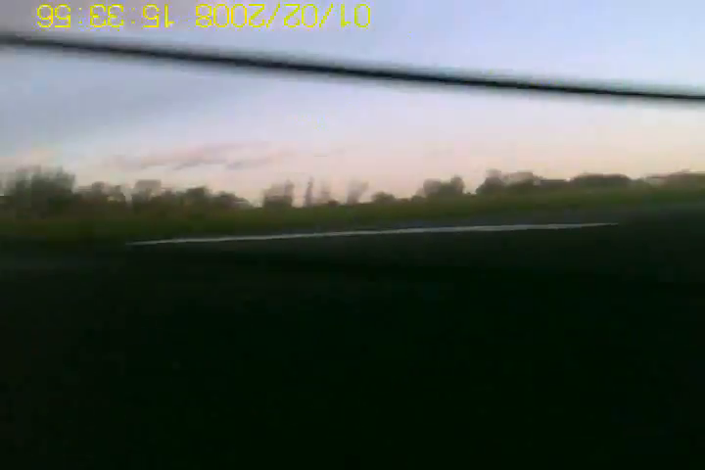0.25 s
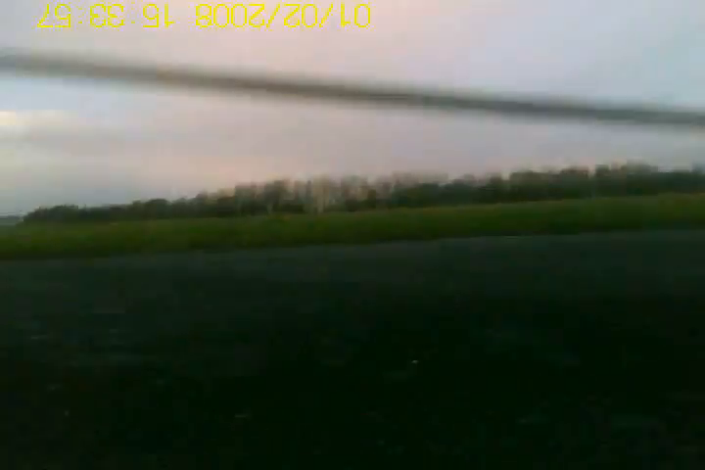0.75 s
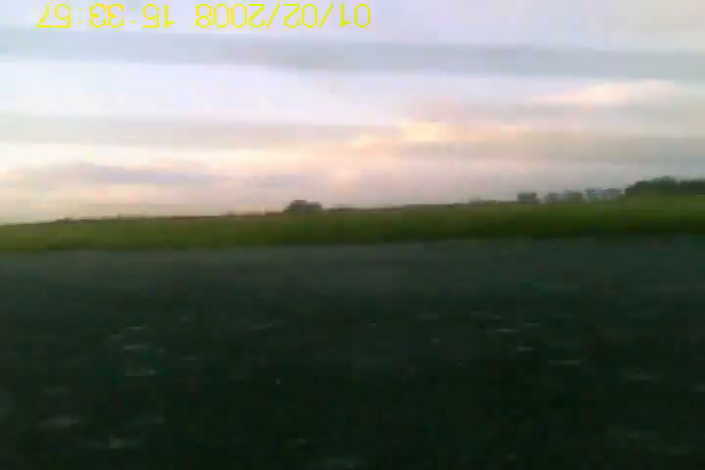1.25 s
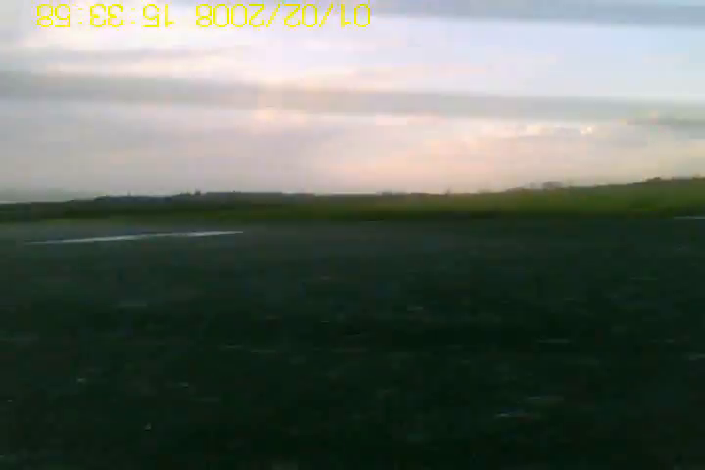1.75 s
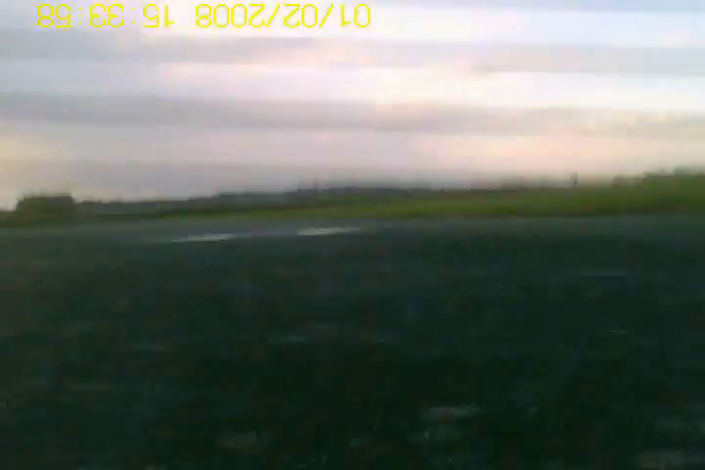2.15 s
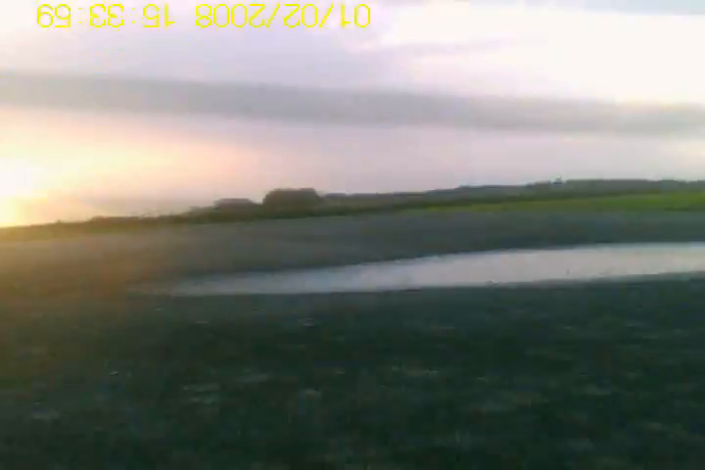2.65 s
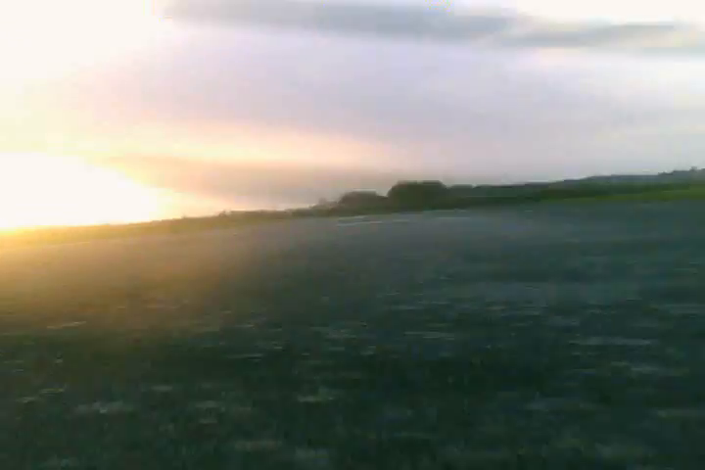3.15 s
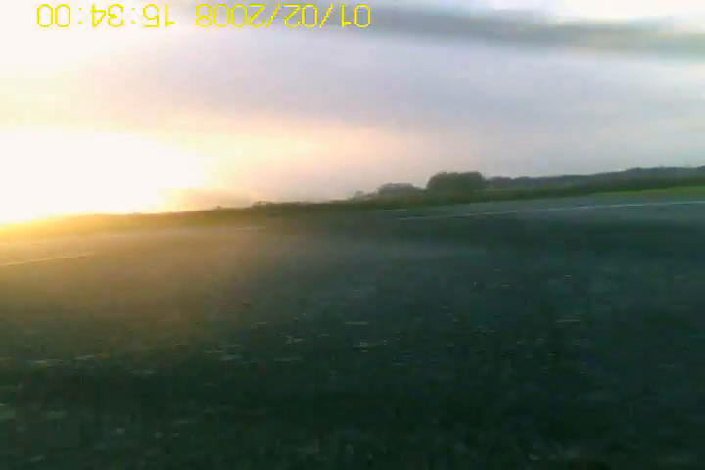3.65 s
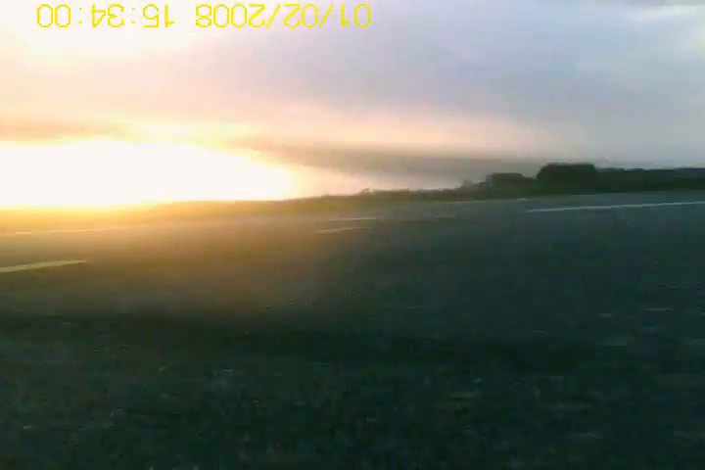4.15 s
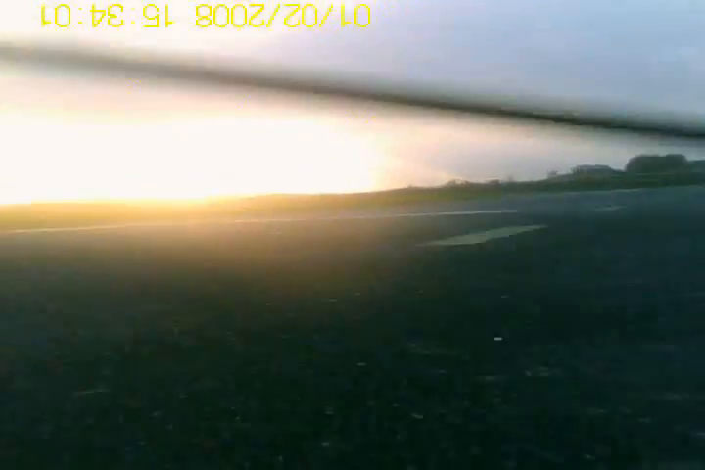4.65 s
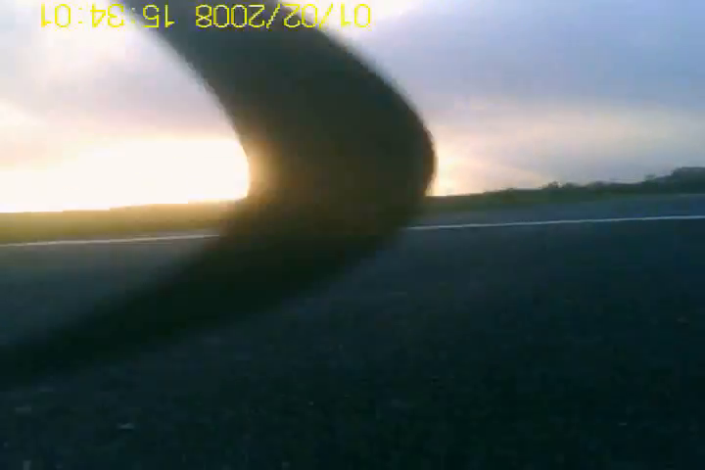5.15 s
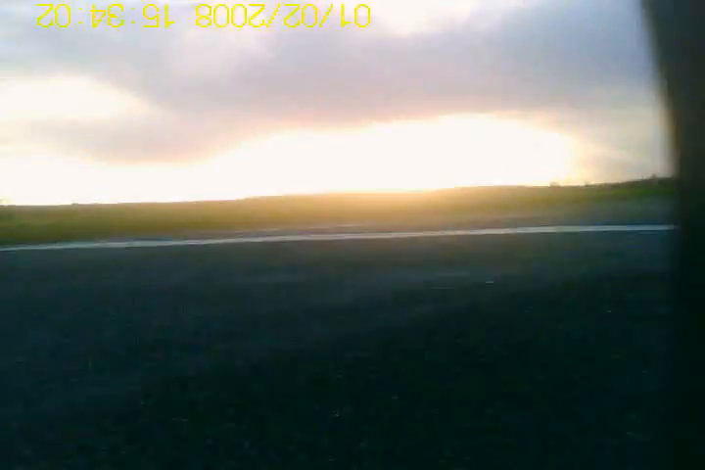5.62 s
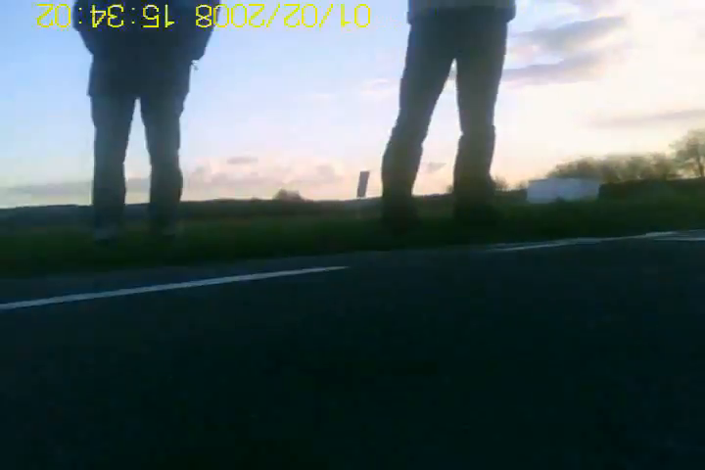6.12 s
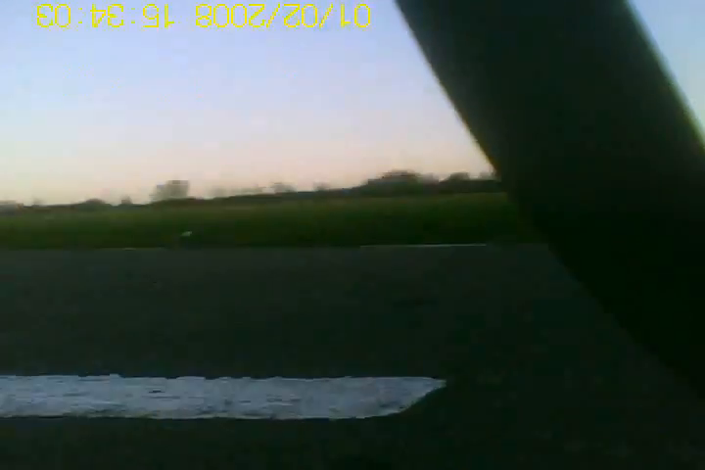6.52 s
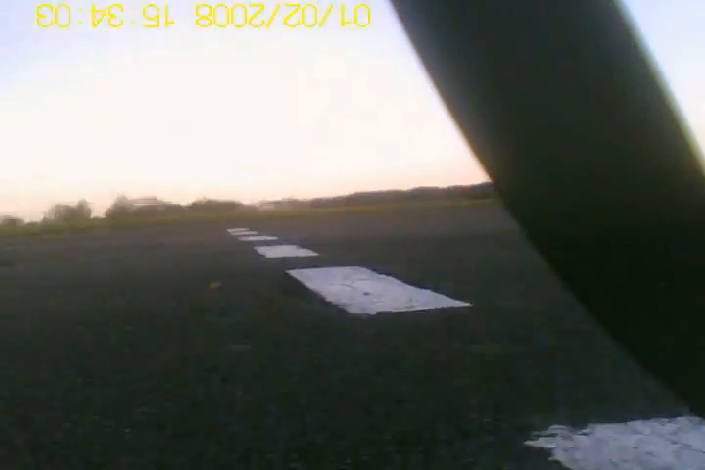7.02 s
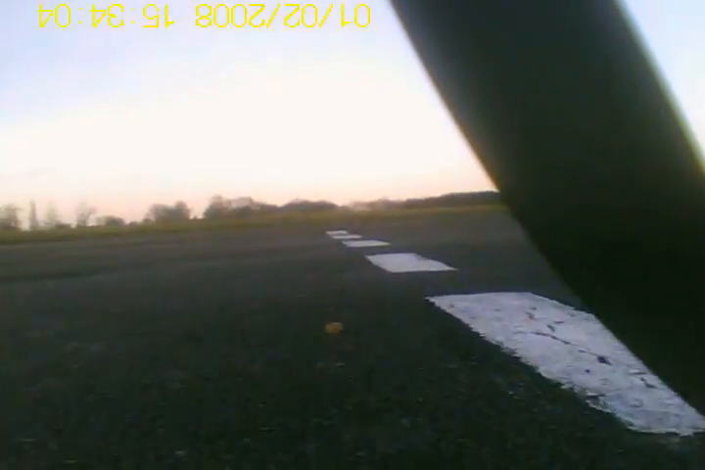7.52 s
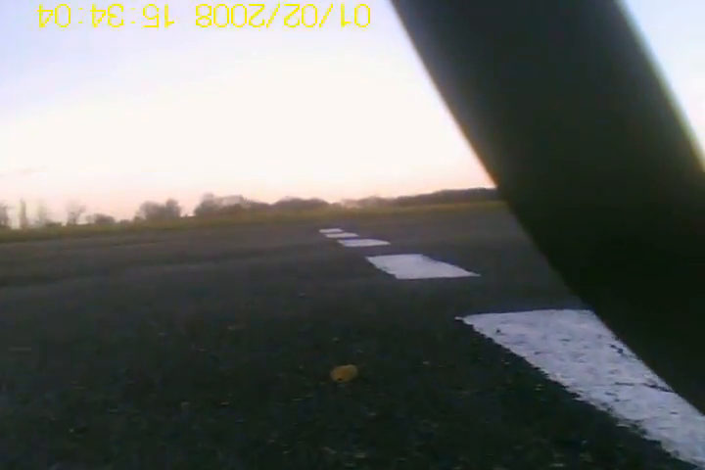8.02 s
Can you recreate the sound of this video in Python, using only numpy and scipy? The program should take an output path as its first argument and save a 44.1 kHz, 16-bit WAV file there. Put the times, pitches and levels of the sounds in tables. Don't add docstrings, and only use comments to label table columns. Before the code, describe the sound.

A microphone fixed to a little propeller plane picks up harsh rolling grit and loose clatter, a short growling rev that briefly overloads with a crackle, and a longer, steadier rev. Afterwards the drone sinks and coasts away, leaving dull wheel grind and bumps outdoors in a light breeze. The frame rattles again, jolts sharply, and the wheels scrape haltingly to rest, leaving faint hiss.

```python
import sys
import numpy as np
from scipy import signal
from scipy.fft import rfft, irfft
from scipy.io import wavfile

SR = 44100
rng = np.random.default_rng(int(sys.argv[2]) if len(sys.argv) > 2 else 0)


def waveform_to_disk(signal):
    frames = np.transpose(np.atleast_2d(signal))
    scaled = np.clip(frames, -1, 1) * 32767
    samples = np.round(scaled).astype(np.int16)
    wavfile.write(sys.argv[1], SR, samples)


def nominal_scale(level):
    x = np.asarray(level, float) / 20
    return 10 ** x


N = 365148


def rms_one(x):
    return x / np.sqrt(np.mean(x ** 2) + 1e-20)


def in_time(rows):
    s, *columns = np.transpose(rows)
    return [np.interp(np.arange(N) / SR, s, c) for c in columns]


def spells(rows, rise, fall):
    s = np.arange(N) / SR
    gain = 0
    for start, hold, db in rows:
        early = np.clip(start - s, 0, 1)
        late = np.clip(s - start - hold, 0, 1)
        gain = gain + nominal_scale(db - rise * early - fall * late)
    return gain


def drift(rate):
    r = np.exp(-2 * np.pi * rate / SR)
    return rms_one(signal.lfilter([1], [1, -2 * r, r * r], rng.standard_normal(N + SR))[SR:])


def colour(x, spectrum):
    size = 2 ** 20
    hz, db = np.transpose(spectrum)
    bin_hz = np.arange(size // 2 + 1) * SR / size
    log_gain = np.log(nominal_scale(np.interp(np.log(bin_hz + 1), np.log(hz), db)))
    cepstrum = irfft(log_gain)
    cepstrum[1:size // 2] *= 2
    cepstrum[size // 2 + 1:] = 0
    return rms_one(irfft(rfft(x, size) * np.exp(rfft(cepstrum)))[:N])


def resonate(x, modes):
    out = 0
    for k, (hz, width, db) in enumerate(modes):
        r, w = np.exp(-np.pi * abs(width) / SR), 2 * np.pi * hz / SR
        ring = signal.lfilter([0, np.sin(w)], [1, -2 * r * np.cos(w), r * r], x + 1e-18)
        out = out + (-1) ** k * nominal_scale(db) * ring
    return out


def sharp(x, modes):
    out = 0
    for hz, width, db in modes:
        band = signal.butter(1, [hz * .85, hz * 1.15], "band", fs=SR, output="sos")
        out = out + resonate(signal.sosfilt(band, x), [(hz, width, db)])
    return out


def grains(per_s, spread_db):
    sizes = nominal_scale(spread_db * np.minimum(rng.exponential(1, N), 5)) * rng.choice([-1, 1], N)
    return sizes * (rng.random(N) < per_s / SR)


def struck(s, peak_db, modes, contact_ms):
    size = 400
    decay = np.exp(-np.arange(size) / (contact_ms * SR / 1000))
    bursts = 0.26 * rng.standard_normal((len(s), size)) * decay
    bursts[:, 0] = 1.0
    bursts *= (nominal_scale(peak_db) / np.sqrt(np.sum(bursts ** 2, axis=1)))[:, None]
    force = np.zeros(N + size)
    np.add.at(force, (np.asarray(s) * SR).astype(int)[:, None] + np.arange(size), bursts)
    return sharp(force[:N], modes)


# frequency in Hz, level in dB per Hz.
SELF_NOISE = [(1590, -35), (2700, -5), (7010, -9.5), (7660, -9), (15800, -24)]
# frequency in Hz, level in dB.
SELF_TONES = [(3892, -83.5), (5599, -86), (7402, -90), (9598, -96), (12452, -101)]
SELF_DB = -72


def electronics():
    s = np.arange(N) / SR
    whines = sum(nominal_scale(db + 5.5) * np.sin(2 * np.pi * hz * s) for hz, db in SELF_TONES)
    return nominal_scale(SELF_DB) * colour(rng.standard_normal(N), SELF_NOISE) + whines


# time in seconds, buffeting in dB.
AIR = [(0.0, -22), (0.69, -29.5), (0.9, -17.5), (1.12, -17.5), (1.27, -20), (1.45, -29.5), (1.64, -37.5),
       (1.91, -19.5), (2.07, -28.5), (2.19, -16.5), (2.49, -21.5), (2.67, -25.5), (2.84, -36.5),
       (4.36, -33.5), (4.91, -40.5), (6.0, -43.5), (7.43, -55.5), (8.28, -60.5)]
# frequency in Hz, level in dB per Hz.
BREEZE = [(1.8, -18.5), (3.0, -1), (18, -11), (38, -28.5), (150, -34.5), (200, -80), (330, -120)]
BUFFET = [(13, -27.5), (22, -9.5), (75, 1), (102, -5.5), (215, -5), (250, -12), (320, -38), (550, -120)]
HISS = [(53, -40), (90, -18), (162, 4), (215, -9.5), (270, 2), (447, -1.5), (1100, -14), (1430, -5.5),
        (2420, -120)]
# start in seconds, hold in seconds, level in dB.
GUSTS = [(1.7, .05, -36), (2.6, 0.13, -24.5), (4.75, 0.024, -45), (6.14, 0.03, -32.5), (6.4, 0.06, -28.5),
         (6.8, 0.76, -39), (7.8, 0.067, -30.5), (8.27, .02, -33.5)]
GUST_RISE, GUST_FALL = 143, 85
# frequency in Hz, width in Hz, level in dB.
FLEX = [(78, 12, 0)]
FLEX_DB = -53
BREEZE_DB, STIRRED_DB = -48.5, -3.5
RUSH_DB, RUSH_FOLLOWS, ROLLING_RUSH_DB = -31.5, 0.75, -7


def air():
    (buffet_db,), (roll_db, coarse_db) = in_time(AIR), in_time(ROLL)
    breeze = colour(rng.standard_normal(N), BREEZE)
    buffet = colour(rng.standard_normal(N) * nominal_scale(2.6 * drift(4.9)), BUFFET)
    hiss = colour(rng.standard_normal(N) * nominal_scale(1.3 * drift(34)), HISS)
    gusts = nominal_scale(BREEZE_DB) + nominal_scale(buffet_db + STIRRED_DB) + spells(GUSTS, GUST_RISE, GUST_FALL)
    flow_rush = nominal_scale(RUSH_DB + RUSH_FOLLOWS * (buffet_db + 26))
    rolling_rush = nominal_scale(roll_db + 0.52 * coarse_db + ROLLING_RUSH_DB)
    flex = nominal_scale(FLEX_DB) * rms_one(resonate(rng.standard_normal(N), FLEX))
    return gusts * breeze + nominal_scale(buffet_db) * buffet + np.hypot(flow_rush, rolling_rush) * hiss + flex


# time in seconds, peak of the thin ring in dB.
KNOCKS = [(0.044, -31), (0.0536, -28), (0.071, -33.5), (0.0847, -40), (0.0918, -26), (0.2195, -44),
          (0.2458, -35.5), (0.258, -44.5), (0.2822, -28.5), (0.352, -37.5), (2.955, -56), (4.123, -55),
          (5.7625, -44.5), (5.936, -39), (5.9542, -43), (5.9837, -46), (6.0036, -34.5), (6.0906, -33),
          (6.0902, -44.5), (6.119, -44.5), (6.1334, -39), (6.1587, -34.5), (6.169, -38), (6.178, -34),
          (6.22, -37), (6.2807, -46), (6.3426, -38), (6.4398, -40)]
# start in seconds, length in seconds, mean level in dB.
CHATTER = [(0.014, .08, -52), (0.161, .16, -39.5), (0.337, .07, -55), (5.937, .08, -44), (6.082, 0.11, -41),
           (6.216, 0.13, -54), (6.331, .03, -44), (6.417, .02, -46), (6.536, .005, -49)]
CHATTER_GAP_S, CHATTER_SCATTER_DB = .0095, 3.5
# time in seconds, peak
# in dB.
BUMPS = [(2.6644, -29), (2.9347, -27.5), (3.255, -20), (3.4999, -24.5), (3.521, -30), (3.562, -28),
         (4.6443, -23), (4.9701, -24.5), (5.2749, -26), (6.1679, -10.5), (6.2188, -27), (6.9401, -22),
         (7.3253, -35), (7.3766, -40), (7.4445, -26.5), (7.4484, -35), (7.4564, -38), (7.4684, -37),
         (7.5662, -41), (7.6286, -40), (7.7518, -42), (7.856, -47), (7.8994, -46.5), (8.272, -59),
         (1.797, -22)]
# frequency in Hz, width in Hz, level in dB.
FRAME_LOW = [(280.3, 24, 2.5), (371, 33, -4.5), (170.7, 73, -14.5), (593.6, 70, 3)]
FRAME_MID = [(1384, 170, 0.5), (1706, 270, -1), (3154, 440, 1), (5240, 185, -14.5)]
FRAME_TOP = [(6980, 330, -2), (8840, 255, -3), (13260, 400, -7), (15400, 500, -12.5)]
JOLT = [(1886, 520, 8.5), (1620, 199, 2), (588, 74, -7.5), (3360, 120, -21.5)]


def rattle():
    s, peak_db = np.transpose(KNOCKS)
    for start, length, db in CHATTER:
        chance = rng.standard_normal((16, 2))
        after = CHATTER_GAP_S * (np.arange(16) + 0.25 * chance[:, 0])
        s = np.append(s, start + after)
        past_end = 200 * (after > length)
        peak_db = np.append(peak_db, db + CHATTER_SCATTER_DB * chance[:, 1] - past_end)
    knocks = struck(s, peak_db + 1.0, FRAME_TOP, contact_ms=0.46)
    knocks += struck(s, peak_db + 22.5, FRAME_MID, contact_ms=0.46)
    knocks += struck(s, peak_db + 10.5, FRAME_LOW, contact_ms=0.88)
    s, peak_db = np.transpose(BUMPS)
    jolts = struck(s, peak_db + 3.5, JOLT, contact_ms=1.0)
    jolts += struck(s, peak_db - 8, FRAME_MID, contact_ms=6.7)
    return knocks + jolts


# time in seconds, grinding in dB, coarseness of the ground in dB.
ROLL = [(0.0, -23.5, -13), (0.06, -17.5, -2), (0.14, -24, 0.5), (0.25, -21, -3.5), (0.41, -26.5, 2),
        (0.83, -26, -1), (1.5, -43, 8.5), (2.9, -38, 3), (4.3, -35, 0.5), (4.98, -33.5, 2),
        (5.34, -34.5, 0), (5.9, -30, -2), (6.17, -27, 2.5), (6.55, -23, -11.5), (6.77, -27, -7.5),
        (7.24, -46.5, -7), (7.5, -46, -1.5), (8.28, -59.5, -14)]
# start in seconds, hold in seconds, level in dB.
LURCHES = [(6.785, .016, -31), (6.83, 0.017, -32.5), (6.87, 0.036, -28), (6.942, 0.033, -29.5),
           (7.003, 0.011, -33.5), (7.045, 0.0053, -41), (7.075, 0.019, -33.5), (7.12, 0.011, -38),
           (7.16, 0.0081, -49), (7.205, 0.018, -48), (7.255, .01, -50), (7.32, 0.012, -43),
           (7.445, 0.013, -48), (7.56, 0.012, -57), (7.86, 0.017, -50)]
LURCH_RISE, LURCH_FALL = 900, 450
# frequency in Hz, level in dB per Hz.
GRIND = [(250, -29), (420, -9), (605, -18.5), (844, -8), (1110, -11), (1620, -0.5), (2160, -5), (2720, -20),
         (3680, -19.5), (4220, -30), (5140, -23.5), (6260, -30), (7860, -48), (12200, -59.5), (15800, -48)]
# frequency in Hz, width in Hz, level in dB.
FRAME_SING = [(1218, 10, -2), (1624, 42, 5), (1904, 64, -1.5), (3365, 31, -5), (3760, 110, -8.5),
              (4930, 100, -20)]
SHAKE_DB, SHAKE_THRUM_DB = -8.5, 4
BRIGHT_DB, BRIGHT_REVVED_DB, SMALL_RATTLE_DB = -12.5, 2.5, -74
BRIGHT_FOLLOWS = 0.13


def wheels(phase):
    s = np.arange(N) / SR
    (roll_db, coarse_db), (power_db,) = in_time(ROLL), in_time(THROTTLE)
    level = np.hypot(nominal_scale(roll_db), nominal_scale(power_db + SHAKE_DB)) + spells(LURCHES, LURCH_RISE, LURCH_FALL)
    low = np.hypot(nominal_scale(roll_db + coarse_db), nominal_scale(power_db + SHAKE_THRUM_DB))
    revved = np.clip((np.gradient(phase) * SR / (2 * np.pi) - 45) / 50, 0, 1)
    slowing = np.clip(s - 6.4, 0, .5) * 2
    clumps = nominal_scale(1.45 * drift(37) * (1.5 - 0.2 * revved + 0.15 * slowing))
    clumps *= nominal_scale(1.9 * revved * np.cos(phase - .6))

    grit = grains(7000, spread_db=3.0) * clumps
    grind = colour(grit, GRIND) + nominal_scale(-14.5 + 1.7 * slowing) * rms_one(sharp(grit, FRAME_SING))
    bright = signal.sosfiltfilt(signal.butter(2, 2400, "high", fs=SR, output="sos"), grind)
    bright_db = BRIGHT_DB + BRIGHT_REVVED_DB * revved + BRIGHT_FOLLOWS * (roll_db + 32.5)
    grind = signal.sosfilt(signal.cheby1(4, 1, 2380, fs=SR, output="sos"), grind)
    grind = grind + nominal_scale(bright_db) * rms_one(bright)

    thrum = rms_one(resonate(grains(1500, spread_db=-1.5) * clumps, FRAME_LOW))
    tick = grains(260, spread_db=4.0) * nominal_scale(3 * drift(6))
    tick = rms_one(sharp(tick, FRAME_TOP)) + nominal_scale(18.0) * rms_one(sharp(tick, FRAME_MID))
    rolling = np.clip((7.15 - s) / 0.2, 0, 1)
    ticking = nominal_scale(SMALL_RATTLE_DB + 2.5) * rolling * tick
    return level * grind + low * nominal_scale(-5.0 - 3.1 * revved) * thrum + ticking


# first kick in seconds, length in seconds, kicks per second,
# gain in rate per second, first kick in dB.
PULLS = [
    (0.7403, .18, 30.3, 184, -19),
    (1.5823, .195, 46, 75, -27),
]
# frequency in Hz, width in Hz, level in dB.
KICK = [(1403, 125, -4), (1870, 410, -2.5), (3760, 440, -19)]
KICK_SCATTER_DB, KICK_SWELL_DB = 1.0, .006


def kicks():
    s, peak_db, n = [], [], np.arange(14)
    for start, length, rate, gain, first_db in PULLS:
        after = (np.sqrt(rate ** 2 + 2 * gain * n) - rate) / gain
        s = np.append(s, start + after)
        db = first_db + KICK_SWELL_DB * gain * n + KICK_SCATTER_DB * rng.standard_normal(len(n))
        peak_db = np.append(peak_db, db - 200 * (after > length))
    return struck(s, peak_db + 7, KICK, contact_ms=1.0)


# time in seconds, level of the wash in dB.
THROTTLE = [(0.6, -62), (0.78, -40.5), (0.93, -16.5), (0.97, -24), (1.114, -15), (1.2, -27.5), (1.4, -43.5),
            (1.65, -47), (1.82, -30.5), (1.95, -24), (2.03, -21), (2.12, -19), (2.3, -19), (2.46, -20.5),
            (2.5, -28), (2.6, -33), (2.7, -35), (2.9, -72.5)]
# start in seconds, hold in seconds, level in dB.
STRAIN = [
    (0.89, 0.22, -36.5),
    (1.95, .17, -41.5),
]
STRAIN_RISE, STRAIN_FALL = 120, 120
# frequency in Hz, width in Hz, level in dB.
MOUNT = [(1280, 210, 3.5), (6520, 55, -26.5)]
BLADE_TICK = [(5120, 380, -8), (8600, 460, -27)]
# frequency in Hz, level in dB per Hz.
WASH = [(240, -25.5), (400, -0.5), (588, -3.5), (740, -8), (1550, -13), (2650, -20.5), (3660, -20.5),
        (4080, -28.5), (5220, -30), (15800, -67)]
WHINE_REST_HZ, WHINE_RISE, WHINE_WIDTH_HZ = 3230, 4.6, 76
TICK_DB, TICK_FOLLOWS = -56, 2.2
POWER_CUT_S, POWER_CUT_DB = 2.475, -1


def motor(phase):
    chop = np.exp(np.cos(phase - .6))
    passes = np.diff(np.floor(phase / (2 * np.pi)), prepend=0) * nominal_scale(2.0 * rng.standard_normal(N))
    shake = rms_one(passes) + .35 * rms_one(rng.standard_normal(N) * chop)
    r = np.exp(-np.pi * WHINE_WIDTH_HZ / SR)
    whine_hz = WHINE_REST_HZ + WHINE_RISE * np.gradient(phase) * SR / (2 * np.pi)
    whine = signal.lfilter([1], [1, -r], shake) * np.sin(2 * np.pi * np.cumsum(whine_hz) / SR)
    ring = rms_one(whine) + nominal_scale(4) * rms_one(sharp(shake, MOUNT))
    tick = rms_one(sharp(rms_one(passes) + .3 * rng.standard_normal(N), BLADE_TICK))
    wash = colour(rng.standard_normal(N) * chop ** 0.5 * nominal_scale(0.65 * drift(33)), WASH)
    s, (power_db,) = np.arange(N) / SR, in_time(THROTTLE)
    out = nominal_scale(-3.5) * spells(STRAIN, STRAIN_RISE, STRAIN_FALL) * ring
    out += nominal_scale(power_db - 2.5) * wash
    out += nominal_scale(TICK_DB + TICK_FOLLOWS * (power_db + 24) - 7.5) * tick
    return out * nominal_scale(POWER_CUT_DB * np.clip((s - POWER_CUT_S) / 0.012, 0, 1))


# time in seconds, blade passes in Hz, level in dB, weight of the fundamental in dB.
PROP = [(0.0, 36.5, -29, 0), (0.76, 37.37, -26, 6), (0.86, 55.07, -14.5, -7), (0.93, 75.8, -11, -2.5),
        (1.02, 101.8, -13.5, -1), (1.08, 108.9, -21, 8.5), (1.2, 100.8, -22, 4), (1.39, 68.7, -32, 11.5),
        (1.65, 46.53, -31.5, -3.5), (1.88, 89.95, -22, 3), (2.06, 114, -19, 1), (2.33, 119.3, -20, 6.5),
        (2.4, 113.2, -18.5, 4.5), (2.52, 85.56, -22.5, 4), (2.7, 61.7, -28.5, 0.5),
        (3.05, 42.5, -39.5, -13), (4.2, 38.03, -38, -17), (4.9, 38.62, -57, -10)]
# multiple of the blade rate, level in dB.
UPPER = [(3, 0.5), (5, -5.5), (6, -15.5), (7, -12.5)]
# start in seconds, hold in seconds, level in dB.
SHUDDERS = [(0.86, 0.13, -16.5), (1.15, 0.013, -12), (1.83, 0.16, -13.5), (2.17, 0.054, -14),
            (2.27, .05, -13)]
SHUDDER_RISE, SHUDDER_FALL = 210, 690
UPPER_DB, FOURTH_DB, IMBALANCE_DB = -3.5, -7.5, -21.5
UPPER_FOLLOWS, FOURTH_FOLLOWS, COAST_DB, UPPER_PER_HZ = 0.35, 0.43, -23.5, .4
IDLE_HZ, IDLE_FOURTH_DB = 46, -11


def propeller():
    blade_hz, level_db, first_db = in_time(PROP)
    phase = 2 * np.pi * np.cumsum(blade_hz * (1 + .004 * drift(20))) / SR
    tone = nominal_scale(level_db + first_db + drift(9)) * np.cos(phase)
    tone += nominal_scale(level_db + drift(9)) * np.cos(2 * phase)
    load_db = np.maximum(in_time(THROTTLE)[0], COAST_DB) + 19 + UPPER_PER_HZ * (blade_hz - 110)

    idle_db = level_db + IDLE_FOURTH_DB + drift(4) - .4 * first_db - 40 * (blade_hz > IDLE_HZ)
    tone += nominal_scale(idle_db) * np.cos(4 * phase)
    turn = nominal_scale(level_db + IMBALANCE_DB) + spells(SHUDDERS, SHUDDER_RISE, SHUDDER_FALL)
    tone += turn * nominal_scale(2 * drift(13)) * np.cos(phase / 2)
    fourth_db = level_db + FOURTH_DB + FOURTH_FOLLOWS * load_db - 0.17 * first_db
    tone += nominal_scale(fourth_db + 2 * drift(5.7)) * np.cos(4 * phase)
    for multiple, db in UPPER:
        upper_db = level_db + UPPER_DB + db + UPPER_FOLLOWS * load_db - .2 * first_db
        tone += nominal_scale(upper_db + 2 * drift(4.7)) * np.cos(round(multiple) * phase)
    stopped = np.clip((PROP[-1][0] - np.arange(N) / SR) / 0.38, 0, 1)
    return -np.sqrt(2) * tone * stopped, phase


def scene():
    tone, phase = propeller()
    plane = tone + motor(phase) + kicks() + wheels(phase) + rattle()
    return (electronics() + air() + plane)[None]


def band_limit(x):
    return signal.sosfilt(signal.butter(12, 16400, fs=SR, output="sos"), x)


OVERFLOW_S, OVERFLOW_SAMPLES = .94645, 10


def record(dry):
    x = 1.159 * np.tanh(dry / 1.38)
    after = np.arange(N) - round(OVERFLOW_S * SR)
    swell = np.exp(-((after - 8) / 45) ** 4)
    x = x + swell * (1 - x)
    wrap = -2. * ((after >= 0) & (after < OVERFLOW_SAMPLES))
    dull = signal.butter(1, 13000, fs=SR, output="sos")
    wrap = signal.sosfiltfilt(dull, wrap)
    return band_limit(np.clip(x + wrap, -1, 1))


dry = scene()
out = record(dry)
waveform_to_disk(out)
```